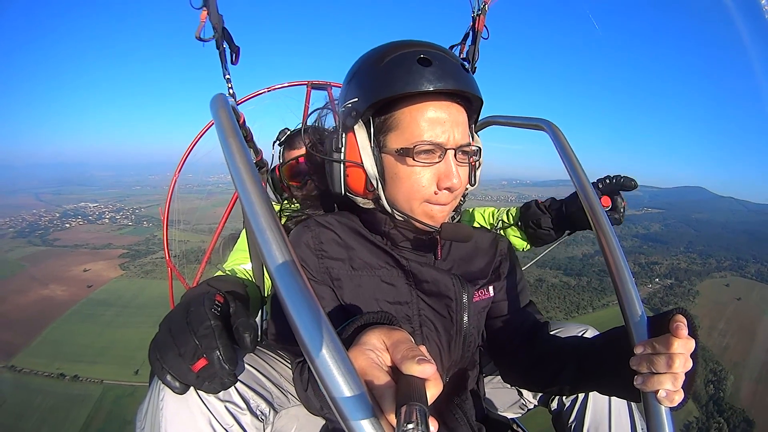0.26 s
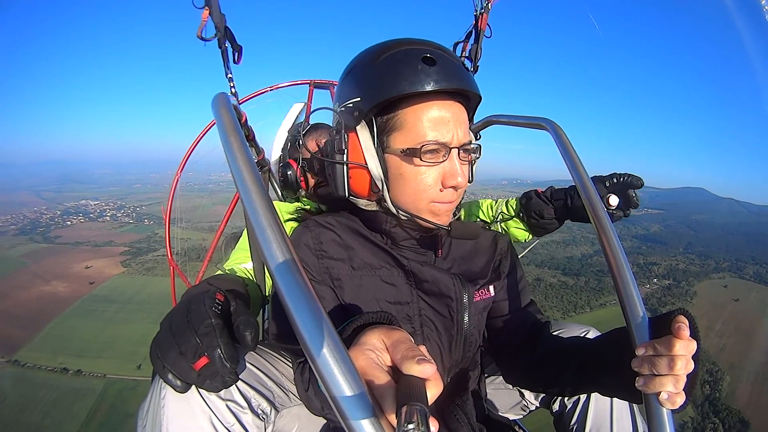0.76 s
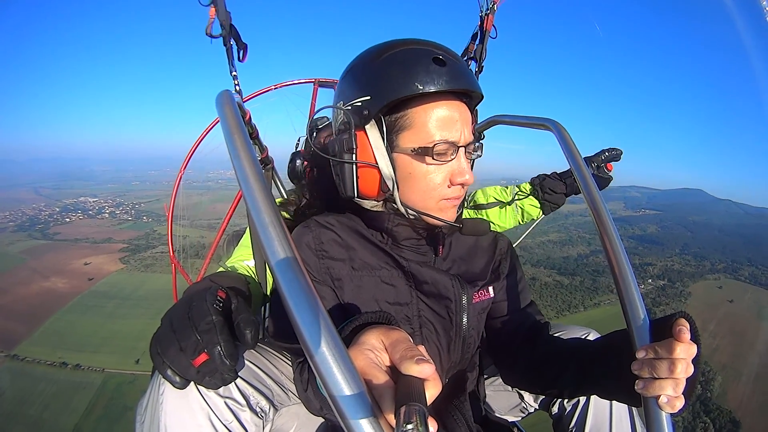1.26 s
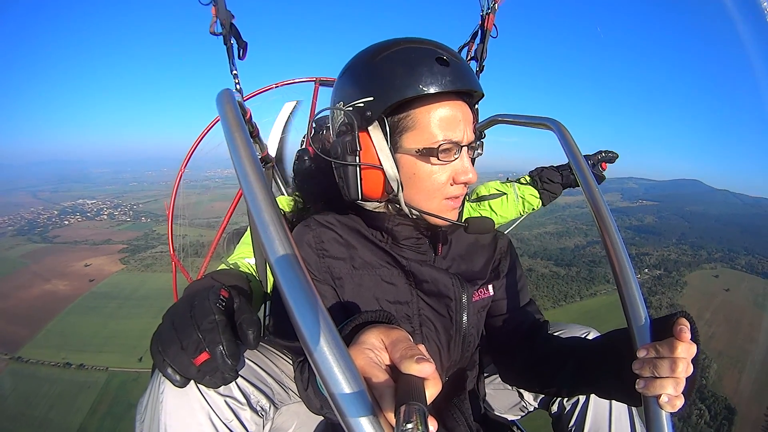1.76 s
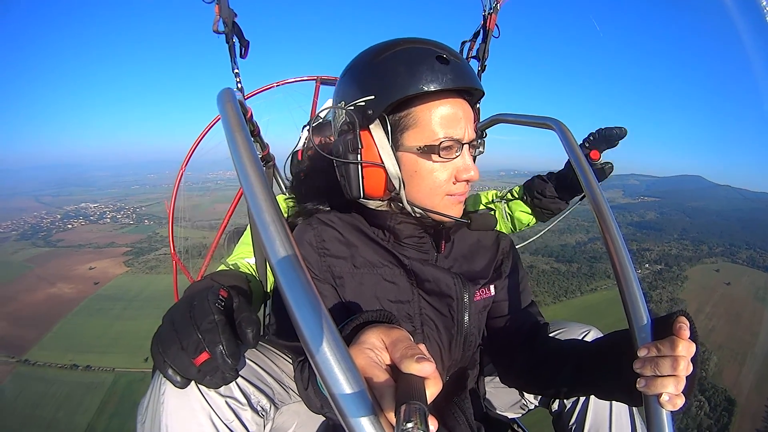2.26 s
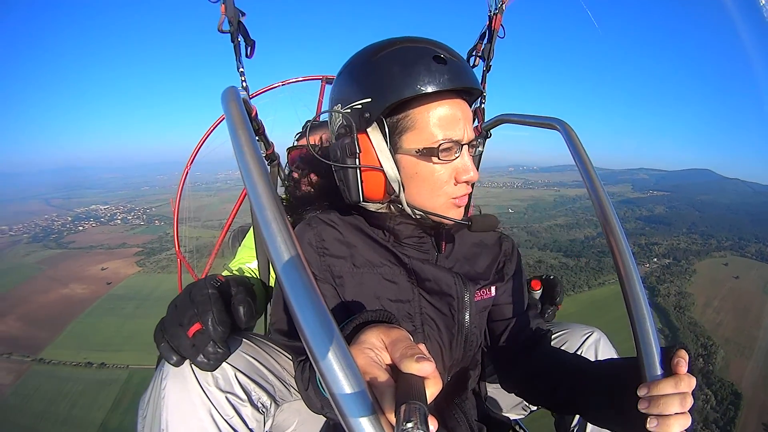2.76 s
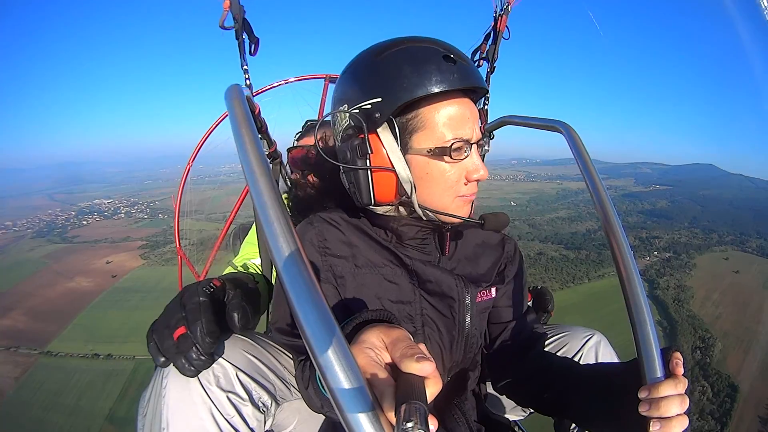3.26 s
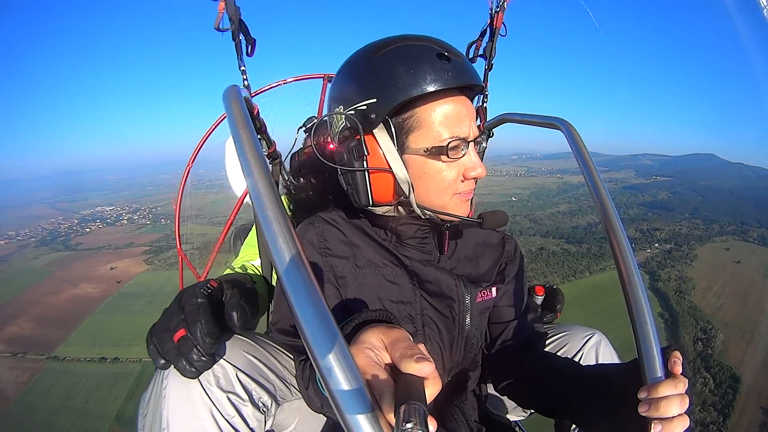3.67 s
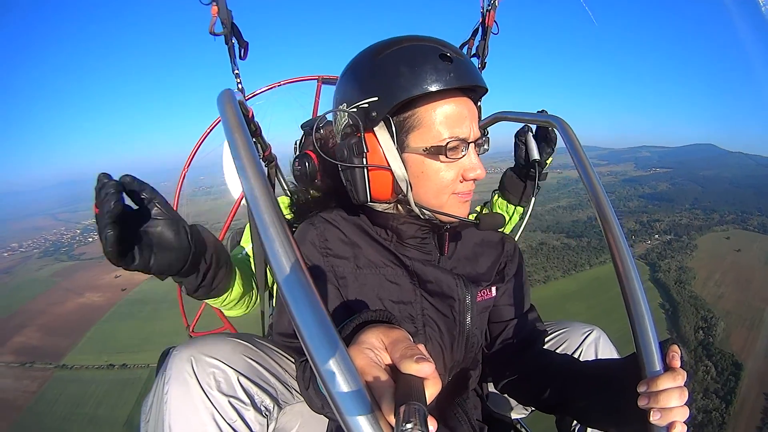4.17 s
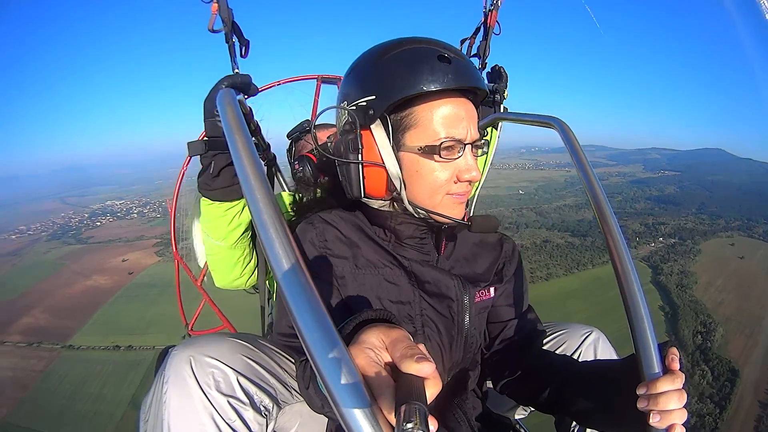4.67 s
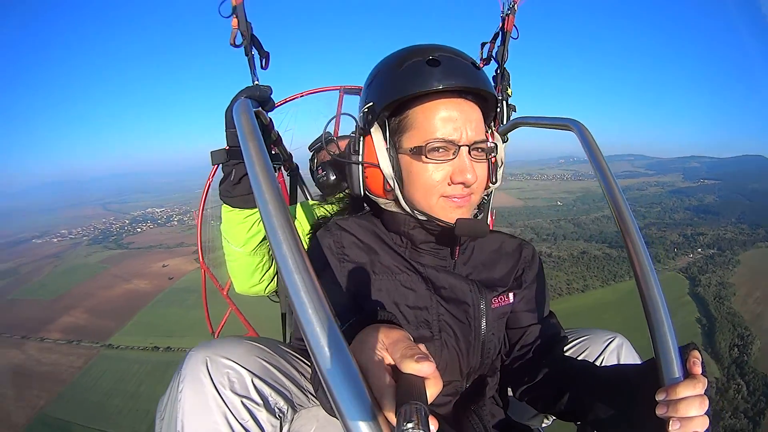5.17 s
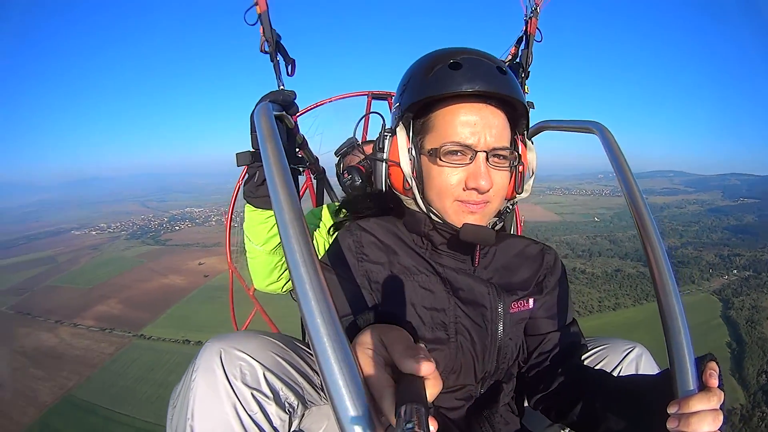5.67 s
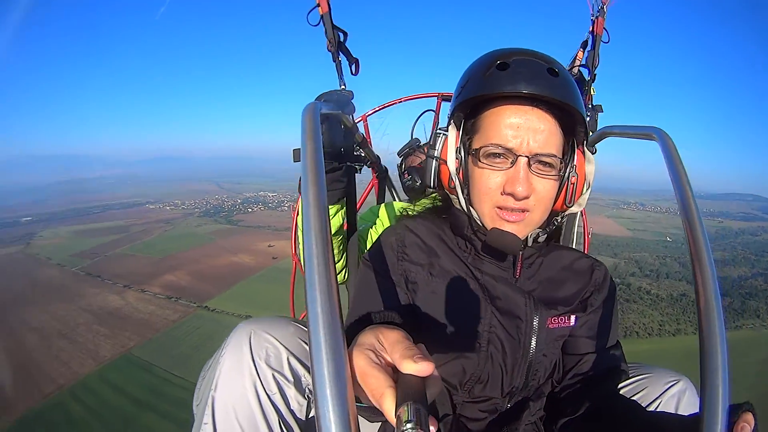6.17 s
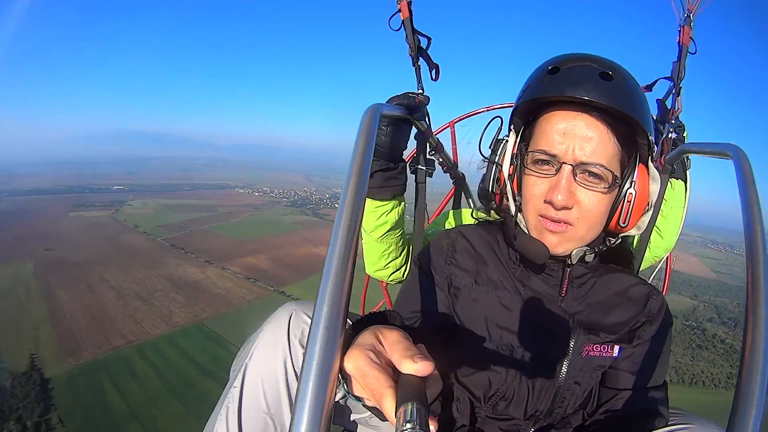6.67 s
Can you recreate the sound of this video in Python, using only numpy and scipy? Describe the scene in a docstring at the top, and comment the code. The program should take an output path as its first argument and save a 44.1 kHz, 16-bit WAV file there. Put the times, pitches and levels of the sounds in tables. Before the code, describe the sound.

A paramotor flies level, its two-stroke engine steady at roughly 4300 turns a minute, close to a stereo camera microphone on a pole in open air. From 0 to about 3.9 seconds, a three-blade propeller slaps and tears the air in a rough, pulsing roar and hiss, over a low exhaust drone, wavering high whines and fine metal rattling. The loose camera knocks about 28 times a second, each sharp clack with a short hollow thump, fusing into a hard stutter. Lumpy wind buffets the case. From 3.9 to 4.9 seconds the pole tilts, colouring the hiss and whine while the knocks soften. Around 5.0 to 5.35 the mount settles and knocking becomes faint. Between 5.4 and 6.6 the pole swings to the front; a low gust swells near 5.8, wind recedes, and the engine and propeller grow louder, brighter and smoother, continuing to the end near 6.9.

```python
"""A three-blade propeller, geared to a two-stroke engine, drives a paramotor in level flight.
Its blades slap and tear the air; the engine drones, whines and rattles. All are built from clicks, noise and sines.
The listener is a camera on a pole in front of the seats, knocking in its mount about once a propeller turn.
The pole is tilted, the mount settles, and the pole swings to the front: a louder engine, a weaker wind."""
import sys
import numpy as np
from scipy import signal
from scipy.fft import rfft, irfft
from scipy.io import wavfile
from scipy.ndimage import uniform_filter1d

SR = 44100
rng = np.random.default_rng(int(sys.argv[2]) if len(sys.argv) > 2 else 0)


def store_pcm(level_fs):
    """Save levels as 16-bit WAV."""
    pcm = np.round(np.clip(level_fs, -1, 1) * 32767).astype(np.int16)
    wavfile.write(sys.argv[1], SR, np.atleast_2d(pcm).T)


N = 305172
TIME, BINS = np.arange(N) / SR, np.fft.rfftfreq(N, 1 / SR)  # seconds, Hz

# The two microphone ports: f/Hz, likeness/0-1, left minus right from the side/dB,
# left minus right from the front/dB, left's lead from the side/radians
PORTS = [(300, 0, 4, -12, 0.84), (704, 0, 12, 6, 1.3), (1010, 0.2, -5.5, -2, 2.5),
         (1215, 0.68, -6.5, -16, 1.1), (1585, 1, 5.5, 7.5, 0.5), (1900, 0.8, 3, 0, 0.47),
         (2305, 0.7, 1, 1, 2), (2780, 0.33, 7, -3, 1.33), (3380, 0.83, 6.5, 2.5, 0.95),
         (4160, 0.97, 5.5, 3, 0.3), (6550, 0.62, 7, 1.5, 0.93), (6350, 0.53, 9.5, 1, 1),
         (7200, 0.83, 6, 0.5, 0.26), (10500, 1, 7, 0.5, 1.2)]


def amp(db):
    """Turns decibels into gain."""
    return 10 ** (np.asarray(db) / 20)


def unit(x):
    """Scales a sound to an rms of 1."""
    return x / np.sqrt(np.mean(x ** 2) + 1e-20)


def across(rows, column=1):
    """Reads one column of a frequency table at every bin, along a logarithmic scale."""
    rows = np.asarray(rows)
    return np.interp(np.log(BINS + 1), np.log(rows[:, 0] + 1), rows[:, column])


def drift(cutoff_hz):
    """Random wavering of rms 1: noise with its fast changes smoothed away."""
    smooth = np.exp(-(BINS / cutoff_hz) ** 2)
    return unit(irfft(rfft(rng.standard_normal(N)) * smooth, N))


def ease(start_s, length_s):
    """A smooth step from 0 to 1."""
    progress = np.clip((TIME - start_s) / length_s, 0, 1)
    return 0.5 - 0.5 * np.cos(np.pi * progress)


def bell(x, centre, width):
    """A smooth hump of height 1."""
    return np.exp(-((x - centre) / width) ** 2)


def facing(levels_db, swing):
    """Gain for the pole's position: 0 at the side, 1 tilted, 2 in front."""
    return amp(np.interp(swing, np.arange(len(levels_db)), levels_db))


def tone(turns):
    """A sine of rms 1 with a random starting point, one cycle for each turn."""
    return np.sqrt(2) * np.cos(2 * np.pi * (turns + rng.random()))


def ring(x, hz, width_hz):
    """A part that rings and dies away when struck; a wider resonance dies away sooner."""
    pole = np.exp((2j * np.pi * hz - np.pi * abs(width_hz)) / SR)
    return signal.lfilter([1], [1, -pole], x).imag


def decay(x, time_s):
    """Lets each click fade away exponentially."""
    return signal.lfilter([1], [1, -np.exp(-1 / (time_s * SR))], x)


def beats(turns, jitter_s, spread_db):
    """One click at every whole turn, uneven in time and size."""
    at = np.flatnonzero(np.diff(np.floor(turns)) > 0)
    late, size = rng.standard_normal((len(at), 2)).T
    clicks = np.zeros(N)
    places = np.clip(at + (late * jitter_s * SR).astype(int), 0, N - 1)
    clicks[places] = amp(spread_db * size)
    return clicks


def air(spectrum, column=1):
    """Turbulent noise of a given colour, partly alike at the two ports."""
    first, second = rfft(rng.standard_normal((2, N)))
    same = np.clip(across(PORTS), 0, 1)
    pair = np.array([first, same * first + np.sqrt(1 - same ** 2) * second])
    return unit(irfft(pair * amp(across(spectrum, column)), N))


def band(hz, width_hz):
    """A band of noise, largely alike at the two ports."""
    shared, own = rng.standard_normal(N), rng.standard_normal((2, N))
    return unit(irfft(rfft(shared + 0.75 * own) * bell(BINS, hz, width_hz), N))


def blades(prop, swing):
    """Each blade slaps through the wake of the frame; the camera case rings for a few milliseconds."""
    # Ring of the camera case: f/Hz, width/Hz, relative level/dB
    case_rings = [(1602, 216, 1.5), (2683, 570, -4), (3100, 1050, -2.5)]
    # Slap levels at the side, tilted, in front: level/dB rms before the ports
    slap_levels = (-29.5, -29, -26)
    slaps = beats(prop * 3 + 0.4, jitter_s=0.00009, spread_db=1.6)
    scatter = decay(slaps, time_s=0.0022) * rng.standard_normal(N)
    drive = slaps + 0.07 * scatter
    # ringing twice makes the sound swell before it dies away
    rings = sum(amp(db) * unit(ring(ring(drive, hz, width), hz, width))
                for hz, width, db in case_rings)
    no_bass = signal.butter(3, 1200, "high", fs=SR, output="sos")
    return facing(slap_levels, swing) * unit(signal.sosfilt(no_bass, rings))


def rush(prop, crank, swing, front):
    """Air torn by the blades and engine hiss, pulsing with blade passes and firings."""
    # Colour of the rushing air: f/Hz, relative level from the side/dB per Hz, from the front/dB per Hz
    air_colour = [(500, -21, -15.5), (856, -21, -19), (986, -14, -14.5), (1303, -12.5, -15),
                  (1440, -2, -1.5), (1780, -5, -3), (2120, -5, -9), (2610, 2.5, -0.5), (2820, 2, 5.5),
                  (3520, -5.5, -3.5), (5230, -5, -3), (7140, -8, -4), (9060, -21.5, -16),
                  (11900, -31.5, -28)]
    # Levels at the side, tilted, in front: level/dB rms before the ports
    roar_levels = (-23.5, -24, -21)
    hiss_levels = (-25, -23.5, -22)
    # Bands that swell at one pole position: position, spread/positions, f/Hz, width/Hz, peak level/dB rms
    swelling_bands = [(1, .35, 5900, 600, -32), (1.35, 0.49, 2410, 260, -23), (1.35, .45, 1140, 110, -40)]
    noise = np.sqrt(1 - front) * air(air_colour) + np.sqrt(front) * air(air_colour, column=2)
    low = irfft(rfft(noise) / (1 + (BINS / 3500) ** 8), N)
    high = noise - low
    # each pulse starts at once and fades over part of a turn
    blade_pass = np.exp(-((3 * prop + 0.4) % 1) / 0.12)
    firing = np.exp(-(2 * crank % 1) / 0.2)
    roar = unit(low * (1 + 0.5 * blade_pass) * amp(0.5 * drift(cutoff_hz=150)))
    waver = amp(1.12 * drift(cutoff_hz=51) + 0.63 * drift(cutoff_hz=30))
    hiss = unit(high * (1 + 0.35 * firing + 0.5 * blade_pass) * waver)
    swell = sum(amp(db) * bell(swing, position, spread) * band(hz, width)
                for position, spread, hz, width, db in swelling_bands)
    return facing(roar_levels, swing) * roar + swell + facing(hiss_levels, swing) * hiss


def blade_hum(prop):
    """The passing blades hum at multiples of three cycles per propeller turn."""
    # Hum: multiple of the blade rate, level/dB rms before the dips
    hum_tones = [(1, -58), (3, -46.5), (4, -51)]
    return sum(amp(db) * tone(3 * order * prop) for order, db in hum_tones)


def drone(crank, settled):
    """Low exhaust tones follow the crank; their balance changes as the mount settles."""
    # Exhaust: multiple of crank speed, level with loose mount/dB rms, with settled mount/dB rms (before dips)
    exhaust_tones = [(1, -54, -55.5), (2, -59, -40.5), (3, -43, -57), (4, -43.5, -40.5), (5, -46.5, -43),
                     (7, -57, -57.5)]
    total = np.zeros(N)
    for order, loose_db, firm_db in exhaust_tones:
        size = (1 - settled) * amp(loose_db) + settled * amp(firm_db)
        total += size * tone(order * crank)
    return total


def whine(crank, swing):
    """High engine tones flutter, and most grow as the camera turns towards them."""
    # Whine: multiple of crank speed, level from the side/dB, from the front/dB (before gain and flutter)
    whine_tones = [(22, -42, -41), (37, -42, -41), (44, -47, -37), (50, -48, -38), (60, -40.5, -37.5),
                   (70, -42, -44), (76, -46, -40), (78, -48, -38), (80, -49, -38), (82, -42, -39),
                   (84, -40, -30), (88, -49, -41), (90, -46, -37), (94, -42, -36), (96, -51, -37),
                   (98, -53, -37)]
    gain_db, flutter_db, flutter_hz = 1.37, 3, 4.7
    # the tilted case favours one band
    boost_db, boost_hz, boost_width_hz = 8, 5450, 620
    # the crank twists a little from firing to firing
    shaken = crank + 0.0008 * drift(cutoff_hz=25)
    tilted = bell(swing, 0.88, 0.34)
    mean_turns_per_s = crank[-1] / TIME[-1]
    total = np.zeros(N)
    for order, side_db, front_db in whine_tones:
        favoured = bell(order * mean_turns_per_s, boost_hz, boost_width_hz)
        db = side_db + (front_db - side_db) * swing / 2
        db = db + boost_db * favoured * tilted + flutter_db * drift(flutter_hz)
        total += amp(db + gain_db) * tone(order * shaken)
    return total


def clatter(crank, swing):
    """Every crank turn rattles the same metal parts, giving a dense comb of faint lines."""
    t = TIME[:600]
    metal = rng.standard_normal((2, len(t))) * np.exp(-t / 0.02)
    # the right port hears nearly the same rattle, but louder
    metal[1] = 2.4 * metal[0] + 0.19 * metal[1]
    strikes = beats(crank, jitter_s=0.00001, spread_db=5.0)
    sound = signal.fftconvolve(strikes[None], metal, axes=1)[:, :N]
    metal_band = signal.butter(2, [2300, 7000], "band", fs=SR, output="sos")
    return amp(-34.5 + 3.3 * swing) * unit(signal.sosfilt(metal_band, sound))


def ports(pair, front):
    """The case makes the two ports differ in level and, from the side, in phase."""
    side = np.array([[0.5], [-0.5]])  # half the difference to each port
    spectrum = rfft(pair)
    lead = np.exp(1j * side * across(PORTS, column=4))
    aside = irfft(spectrum * amp(side * across(PORTS, column=2)) * lead, N)
    ahead = irfft(spectrum * amp(side * across(PORTS, column=3)), N)
    return (1 - front) * aside + front * ahead


def mount_strikes(prop, swing, settled, settle_s):
    """The camera strikes its mount each propeller turn, then only faintly once the mount settles."""
    loose_db, settled_db, fade_db_per_s, tilt_damping_db = 1.94, -8, 3, -5
    faint_db = settled_db - fade_db_per_s * (TIME - settle_s)
    strength_db = (1 - settled) * loose_db + settled * faint_db
    strength_db = strength_db + tilt_damping_db * np.minimum(swing, 1) ** 4
    return beats(prop - 0.27, jitter_s=0.0022, spread_db=1.3) * amp(strength_db)


def mount_knocks(strikes):
    """Each strike gives a sharp clack, then a thump of slower ringing parts."""
    # Thump: f/Hz, width/Hz, left level/dB, right level/dB, delay/s
    thump_rings = [(230, 38.3, -25.5, -20.5, 0.0028), (302, 100, -27, -31, 0.0034),
                   (612, 240, -37, -22.5, 0.0012), (1574, 86, -34, -29, 0.00177)]
    t = TIME[:200]
    burst = t / 0.00033 * np.exp(1 - t / 0.00033) * np.sin(2 * np.pi * 2550 * t)
    clack = signal.oaconvolve(strikes, burst)[:N]
    late_clack = np.interp(TIME - 0.0005, TIME, clack)
    clacks = np.array([0.42 * clack, 0.18 * late_clack])
    thump = np.zeros((2, N))
    for hz, width, left, right, delay in thump_rings:
        late_strikes = np.interp(TIME - delay, TIME, strikes)
        thump += amp([[left], [right]]) * ring(late_strikes, hz, width)
    low_cut = signal.butter(2, 165, "high", fs=SR, output="sos")
    return clacks + signal.sosfilt(low_cut, thump)


def din_dips(strikes):
    """The other sounds dip briefly around each strike; this is their gain."""
    dip = decay(strikes * amp(2 * drift(cutoff_hz=26)), time_s=0.017)
    # start 2.7 ms early with soft edges
    dip = uniform_filter1d(np.interp(TIME + 0.0027, TIME, dip), size=30)
    # take away the local average so the general level stays about the same
    return amp(-6 * (dip - uniform_filter1d(dip, size=12000)))


def wind(swing):
    """Lumpy wind on the case, and one low gust as the pole swings to the front."""
    # Colour of the wind: f/Hz, relative level/dB per Hz
    wind_colour = [(25, -25), (50, -18), (100, -10), (160, -2.5), (205, 5.5), (260, -0.5), (340, -3),
                   (450, -4.5), (620, -6), (800, -18), (1200, -26), (3000, -54)]
    # Wind at the side, tilted, in front: level/dB rms before the lumps and dips
    wind_levels = (-34, -36.5, -44.5)
    steady = air(wind_colour) * facing(wind_levels, swing) * amp(3.5 * drift(cutoff_hz=54))
    gust = amp(-41.5) * bell(TIME, centre=5.76, width=0.54) * band(hz=85, width_hz=62)
    return steady + gust


def shake(prop):
    """The propeller's imbalance rocks the pole once a turn, dying away during the swing to the front."""
    size = amp(-51 - 0.5 * drift(cutoff_hz=9)) * (1 - ease(start_s=5.9, length_s=0.5))
    return np.sqrt(2) * size * (np.sin(2 * np.pi * prop) + 0.16 * np.sin(4 * np.pi * prop))


def scene():
    """Propeller and engine turn together through the gear; the pole's position sets what is heard."""
    # Engine speed: t/s, crank speed/turns per minute
    engine_speed = [(0.0, 4293), (0.7, 4275), (1.7, 4284), (2.1, 4318), (2.85, 4324), (3.5, 4312),
                    (4.2, 4335), (5.15, 4349), (5.9, 4335), (6.55, 4316), (6.92, 4311)]
    # Moves of the pole, each on to its next position: start/s, length/s
    pole_moves = [(3.85, 1.02), (5.438, 1.16)]
    gear = 2.58  # crank turns per propeller turn
    settle_s = 5.05
    times, speeds = np.asarray(engine_speed).T
    crank = np.cumsum(np.interp(TIME, times, speeds)) / 60 / SR  # turns so far
    prop = crank / gear
    swing = sum(ease(*move) for move in pole_moves)
    front = np.clip(swing - 1, 0, 1)
    settled = ease(settle_s, length_s=0.3)

    din = blades(prop, swing) + rush(prop, crank, swing, front)
    din = din + whine(crank, swing) + clatter(crank, np.minimum(swing, 1))
    around = ports(din, front) + blade_hum(prop) + drone(crank, settled) + wind(swing)
    strikes = mount_strikes(prop, swing, settled, settle_s)
    return around * din_dips(strikes) + mount_knocks(strikes) + shake(prop)


def record(dry):
    """The camera rounds off the highest peaks, then cuts the treble above about 11 kHz."""
    rounded = dry / (1 + (dry / 0.92) ** 8) ** (1 / 8)
    treble_cut = signal.firwin(511, 11150, window=("kaiser", 9), fs=SR)
    return signal.oaconvolve(rounded, treble_cut[None], "same")


dry = scene()
out = record(dry)
store_pcm(out)
```